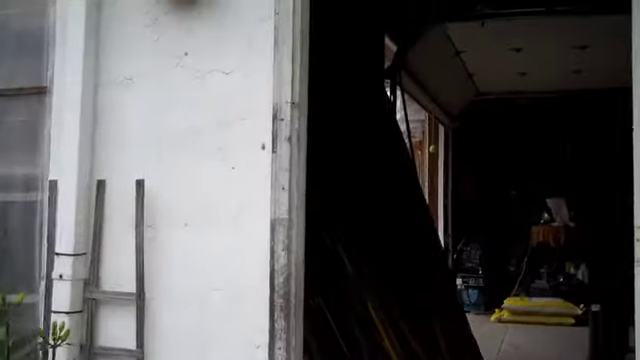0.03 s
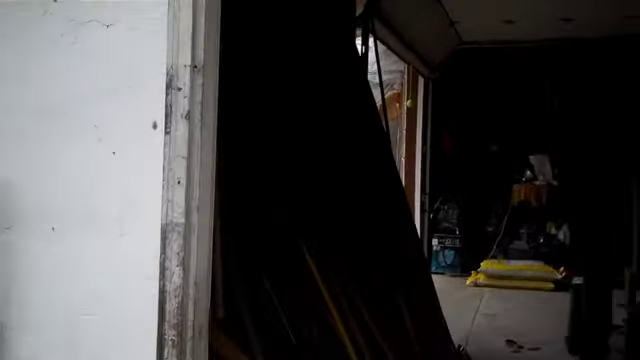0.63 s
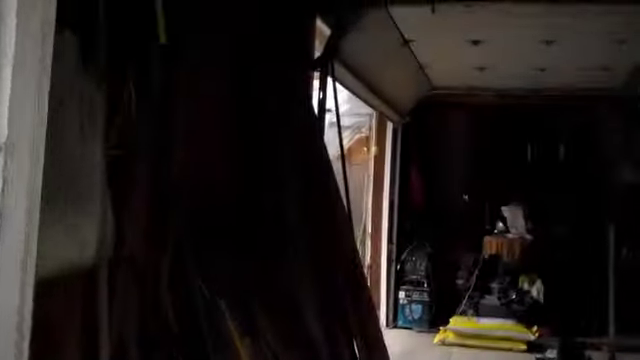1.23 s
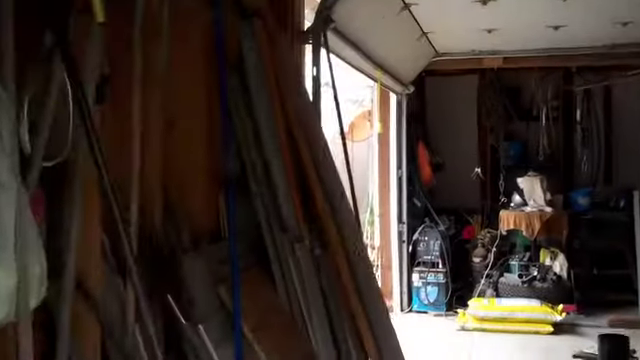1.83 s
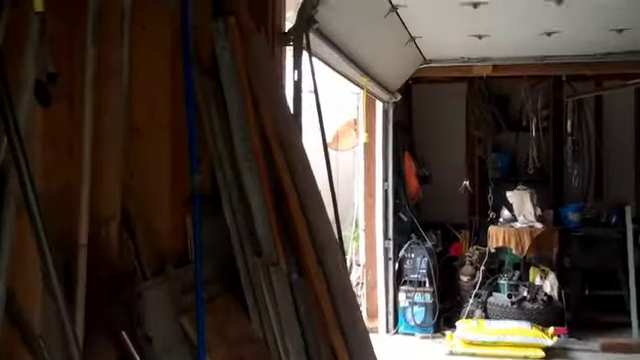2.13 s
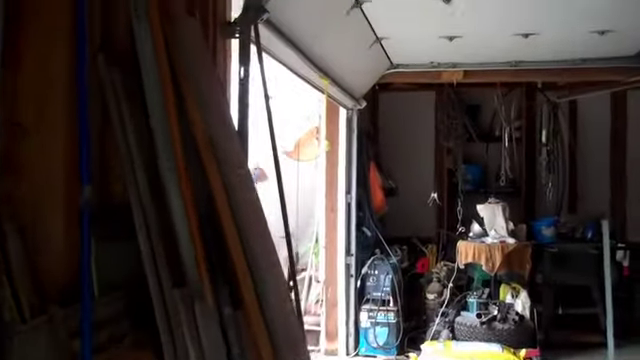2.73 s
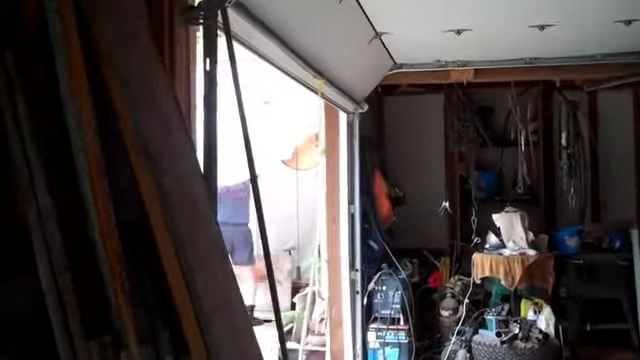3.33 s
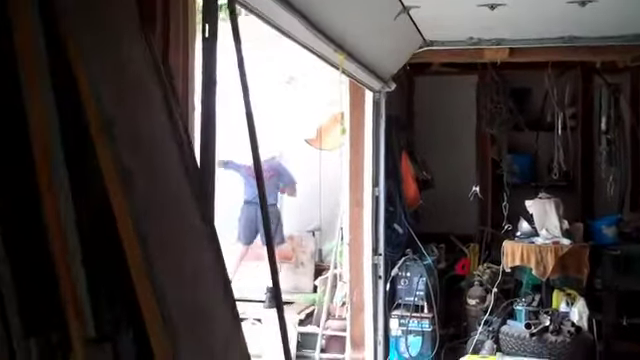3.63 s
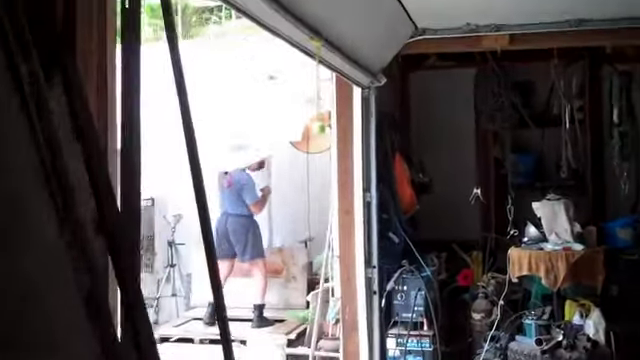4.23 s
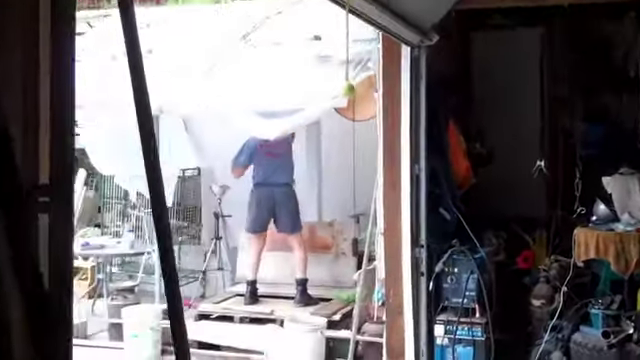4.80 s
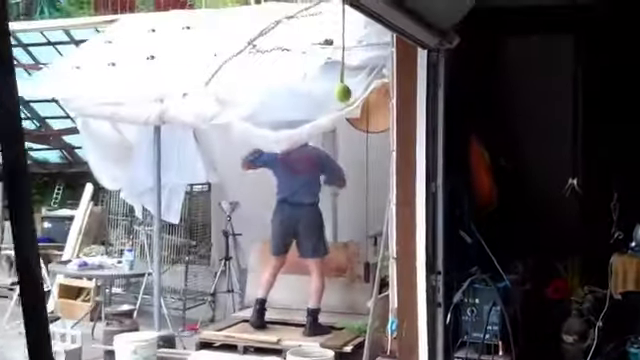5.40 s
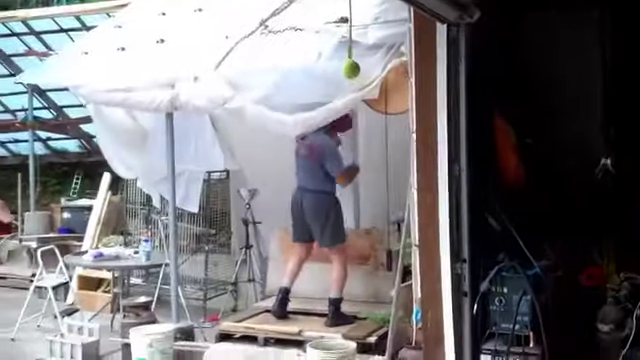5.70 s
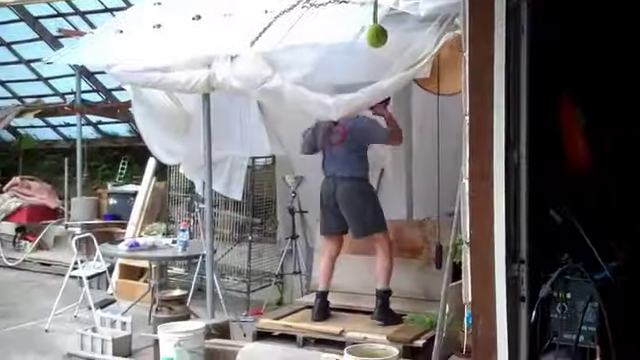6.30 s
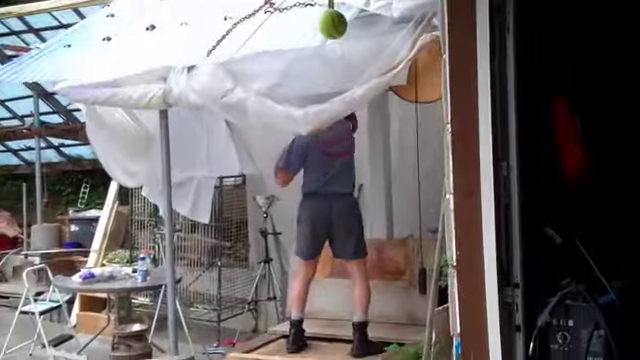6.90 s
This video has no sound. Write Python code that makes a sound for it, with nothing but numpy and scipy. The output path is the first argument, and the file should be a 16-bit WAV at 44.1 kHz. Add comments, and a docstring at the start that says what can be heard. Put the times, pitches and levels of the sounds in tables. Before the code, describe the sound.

Fast rhythmic slaps and knocks of a punched speed bag, with clanking metal swivel, growing nearer over faint outdoor rumble.

```python
"""A speed bag is punched under a wooden board in a yard; the listener walks to it through a garage.
At first, over outdoor rumble and hiss, the blows are soft and arrive largely as reverberation.
In each one the swivel rattles, then the leather slaps, the board knocks and the air bladder thumps;
the loose swivel and the mount clank. As the far door nears, the direct sound takes over,
and at the end the slaps are sharp and overload the microphone."""
import sys
import numpy as np
from scipy import signal
from scipy.io import wavfile
from scipy.ndimage import uniform_filter1d, map_coordinates

SR = 44100
rng = np.random.default_rng(int(sys.argv[2]) if len(sys.argv) > 2 else 0)


def inscribe(sig):
    """Save sig as 16-bit PCM at rate SR to the path in sys.argv[1].

    A 1-D sig is mono; a 2-D sig holds one channel per row.
    Samples are clipped to [-1, 1] before scaling.
    """
    pcm = np.round(np.clip(np.atleast_2d(sig).T, -1, 1) * 32767)
    wavfile.write(sys.argv[1], SR, pcm.astype(np.int16))


N = 306495
AGE = np.arange(SR // 2) / SR  # time since a contact
RATTLE_LEAD_S = 0.0115  # the swivel sounds ahead of the contact

# The bag lands on the board about nine times a second, hardest just after a punch.
# Square landings are short, glancing ones long: t/s, strength/dB, contact time/s
REBOUNDS = [(.0054, -35.5, 0.0073), (.142, -35, .002), (0.2658, -34.5, .0057), (.388, -34.5, .003),
            (0.5144, -38.5, 0.0073), (.6658, -37.5, 0.0038), (.814, -31, 0.0054), (.896, -21.5, 0.0021),
            (.991, -29, 0.0073), (1.106, -40.5, 0.0068), (1.2178, -28, .005), (1.3274, -25.5, 0.0036),
            (1.426, -42, 0.0036), (1.568, -29, 0.0052), (1.7016, -27, 0.0047), (1.7768, -19.5, .0046),
            (1.8746, -27, .007), (1.9943, -26.5, 0.0042), (2.1119, -23.5, 0.0052), (2.2226, -25, .004),
            (2.3347, -25, 0.0073), (2.4701, -26.5, 0.0045), (2.605, -23.5, 0.0048), (2.6876, -15.5, 0.0046),
            (2.7768, -19, .006), (2.887, -24, 0.0039), (3.1048, -20, .006), (3.222, -25.5, .0016),
            (3.361, -35.5, 0.0045), (3.5031, -23.5, 0.004), (3.5936, -19, 0.0024), (3.6964, -23, 0.0045),
            (3.8221, -22.5, 0.0023), (3.9306, -20, 0.0031), (4.0402, -19, .003), (4.16, -19.5, .0015),
            (4.3042, -26.5, .001), (4.4482, -21.5, .0013), (4.523, -12.5, 0.0051), (4.6161, -18, 0.003),
            (4.7314, -19.5, 0.0039), (4.7931, -19, 0.0055), (4.845, -17.5, .0023), (4.951, -13.5, 0.0026),
            (5.062, -17.5, 0.0047), (5.1984, -20.5, 0.0041), (5.33, -19, .0034), (5.4058, -12, 0.0047),
            (5.5047, -15.5, 0.0044), (5.6224, -17, 0.0049), (5.7411, -15.5, 0.0047), (5.8494, -13, .005),
            (5.96, -16.5, .0058), (6.092, -21.5, 0.0029), (6.2276, -15, .003), (6.31, -11.5, 0.0042),
            (6.4023, -14.5, 0.0047), (6.5159, -17, 0.0041), (6.5734, -18, 0.0049), (6.6242, -19.5, 0.0025),
            (6.7222, -13.5, .005), (6.8276, -16.5, 0.0059)]
# The fist meets the bag between rebounds: t/s, strength/dB, bladder thump/dB
PUNCHES = [(0.2526, -42, -49), (0.861, -39, -31.5), (1.164, -45.5, -42), (1.745, -36.5, -35.5),
           (2.657, -25, -32.5), (2.947, -31, -38), (2.9954, -30.5, -33), (3.881, -37, -39.5),
           (3.989, -35, -46), (4.496, -25.5, -32), (4.898, -33, -42), (5.3798, -23.5, -36),
           (5.693, -31, -41), (6.1746, -35.5, -49), (6.2755, -22, -29), (6.6777, -29, -37)]


def amp(db):
    """Amplitude ratio of a level: tenfold for every 20 dB."""
    return 10 ** (np.asarray(db) / 20)


def unit(x):
    """Normalisation to a mean energy of 1 per channel."""
    return x / np.sqrt(np.mean(np.sum(x ** 2, -1)) + 1e-20)


def read(points, hz):
    """Interpolation of a table on a logarithmic frequency axis."""
    f, value = np.transpose(points)
    return np.interp(np.log(hz + 1), np.log(f + 1), value)


def add(mix, s, sound):
    """Superposition: a sound joins the mix at time s."""
    part = mix[:, max(round(s * SR), 0):][:, :sound.shape[-1]]
    part += sound[..., :part.shape[1]]


def response(points, modes=(), size=4096):
    """Minimum-phase impulse response of a spectrum with resonance peaks on top."""
    hz = abs(np.fft.fftfreq(size, 1 / SR))
    db = read(points, hz) + sum(peak / (1 + (2 * (hz - f) / width) ** 2) for f, width, peak in modes)
    log_spectrum = np.conj(signal.hilbert(np.log(amp(db))))
    return np.fft.ifft(np.exp(log_spectrum)).real[:size // 2]


def through(x, taps):
    """Linear filtering: both channels are convolved with an impulse response."""
    return signal.oaconvolve(x, np.atleast_2d(taps), axes=1)[:, :x.shape[1]]


def diffuse(size, apart_hz=5000, leak_db=-22):
    """Diffuse field: at two close ports the noise is coherent in the bass but not in the treble."""
    mid, side = rng.standard_normal((2, size))
    side = amp(leak_db) * side + signal.lfilter(*signal.butter(1, apart_hz, "high", fs=SR), side)
    return np.array([mid + side, mid - side])


def clumps(depth_db, size=48):
    """Reflections arrive in bunches: a random gain that changes about every millisecond."""
    wobble = uniform_filter1d(rng.standard_normal(len(AGE)), size) * np.sqrt(size)
    return amp(depth_db * wobble)


def walk(s):
    """The sound field at time s: the direct-to-reverberant ratio rises towards the door."""
    # t/s, direct share of the attack (0-1), reverberation/dB, rumble/dB, hiss/dB
    path = [(0, 0.6, -5, -42.5, -53), (1.0, 0.52, -4, -41.5, -56), (1.7, 0.58, -6.5, -41, -57.5),
            (2.6, 0.43, -7, -43.5, -52), (3.3, 0.22, -5.5, -45, -51), (3.6, 0.6, -7, -46, -56),
            (4.4, 0.81, -10.5, -47.5, -58), (6.95, 0.88, -11.5, -46.5, -55)]
    times, *columns = np.transpose(path)
    return [np.interp(s, times, column) for column in columns]


def background():
    """Ambient noise: distant rumble and faint hiss, diffuse fields whose levels vary along the walk."""
    # Noise spectra: f/Hz, level/dB
    rumble_spectrum = [(18, -27), (35, -6.5), (70, 1), (125, 2.5), (200, -7), (370, -5), (700, 4.5),
                       (980, 2.5), (1250, -2.5), (2700, -15), (8000, -42)]
    hiss_spectrum = [(300, -28), (2000, -5), (5000, 4), (9000, -0.5), (14000, -1.5)]
    _, _, rumble_db, hiss_db = walk(np.arange(N) / SR)
    rumble = amp(rumble_db) * through(diffuse(N), unit(response(rumble_spectrum)))
    hiss = amp(hiss_db) * through(diffuse(N), unit(response(hiss_spectrum)))
    return rumble + hiss


def reverberation(rise_s=0.0078):
    """Reverberation builds up quickly and decays exponentially, the treble first."""
    # Decay of the garage: f/Hz, T60/s
    decay_times = [(150, 0.54), (500, 0.5), (1500, 0.34), (4000, 0.31), (7000, 0.28), (13000, 0.25)]
    hz, t, bands = signal.stft(diffuse(len(AGE)), SR, nperseg=256)
    decay = amp(-60 * t / read(decay_times, hz)[:, None])
    tail = signal.istft(bands * decay, SR)[1][:, :len(AGE)]
    return unit(tail * clumps(depth_db=2) * (1 - np.exp(-AGE / rise_s)))


def placed(x):
    """Time and level differences: sound from the right reaches the left port later, mostly shaded."""
    # Bearing of the bag: t/s, left delay/s, left gain/dB
    bearing = [(0, 0.000042, -1.5), (1.7, 0.00002, .8), (2.7, 0.000062, -1), (3.3, 0.000032, 0),
               (3.8, 0.000017, -0.5), (4.3, 0.0000045, 0), (6.95, 0.000019, -0.16)]
    times, lags, shade_db = np.transpose(bearing)
    t = np.arange(N) / SR
    left = map_coordinates(x[0], [(t - np.interp(t, times, lags)) * SR], order=3)
    return np.array([left * amp(np.interp(t, times, shade_db)), x[1]])


def swivel(level_db=10, uneven_db=3, rise_s=0.004, fade_s=0.009):
    """Play in a joint: the swivel rattles in a burst of noise just before each contact."""
    # Spectrum of the rattle: f/Hz, level/dB
    rattle_spectrum = [(300, -18), (900, 6.5), (1500, -3), (2300, -9.5), (3200, -6), (8000, -19.5),
                       (14000, -26.5)]
    envelope = np.exp(-AGE / fade_s) * (1 - np.exp(-AGE / rise_s))
    out = np.zeros((2, N))
    for s, db, _ in REBOUNDS + PUNCHES:
        rattle = unit(diffuse(len(AGE)) * clumps(depth_db=4) * envelope)
        start = s - RATTLE_LEAD_S * rng.uniform(0.95, 1.15)
        add(out, start, amp(db + level_db + uneven_db * rng.standard_normal()) * rattle)
    return through(out, unit(response(rattle_spectrum)))


def lesser_bursts(mount_hz=600, swivel_hz=1650, tail_hz=450, spread=0.16):
    """Momentum transfer: punches tug the mount, swings throw the swivel. A low-mid tail follows each
    landing. Returns t/s, level/dB, f/Hz."""
    tugs = [(s, thump_db + 20, mount_hz) for s, _, thump_db in PUNCHES]
    throws = [(s - RATTLE_LEAD_S, db, swivel_hz) for s, db, _ in REBOUNDS]
    low_tails = [(s + 0.018, db - 4, tail_hz) for s, db, _ in REBOUNDS]
    return [(s, db, hz * np.exp(spread * rng.standard_normal()))
            for s, db, hz in tugs + throws + low_tails]


def clanks(level_db=6, edge_ratio=1.22, room_db=-5, ring_hz=1528, ring_t60=0.18, ring_db=-14):
    """Impact excitation: a loose joint hits its stop in a band of noise and leaves the metal ringing."""
    # Prominent clanks of swivel (high) and mount (low): t/s, level/dB, f/Hz
    prominent = [(1.781, -7, 445), (2.606, -6, 1080), (2.687, -9, 1020), (3.013, -12.5, 420),
                 (4.439, -9, 1670), (4.525, -3.5, 560), (4.794, -6, 1500), (4.943, -6.5, 1440),
                 (5.399, -1, 1010), (6.082, -6.5, 1860), (6.611, -4.5, 1960), (6.747, -3, 1580),
                 (6.817, -2.5, 1590), (6.828, -6, 1480)]
    envelope = np.exp(-AGE / 0.0072) * (1 - np.exp(-AGE / 0.0058))
    ring = unit(np.sin(2 * np.pi * ring_hz * AGE) * amp(-60 * AGE / ring_t60))
    out = np.zeros((2, N))
    for s, db, hz in prominent + lesser_bursts():
        burst = unit(diffuse(len(AGE)) * envelope) + amp(room_db) * reverberation()
        band = signal.butter(2, [hz / edge_ratio, hz * edge_ratio], "band", fs=SR)
        clank = unit(signal.lfilter(*band, burst))
        add(out, s, amp(db + level_db) * (clank + amp(ring_db) * ring))
    return out


def thump(direct, pulse_hz=125, delay_s=0.00882, boom_db=1):
    """Air spring: the bladder is squeezed and recoils in one swing; a low room boom rings on after it."""
    # Low room modes: f/Hz, level/dB, T60/s
    room_modes = [(68, -18, 0.26), (90, -15.5, 0.36), (121.8, -10, 0.24), (161.2, -14, 0.3)]
    squeeze = rng.uniform(0.8, 1.1)
    u = (np.pi * pulse_hz * squeeze * (AGE - delay_s)) ** 2
    push = (2 * u - 1) * np.exp(-u)
    boom = np.zeros(len(AGE))
    for hz, db, t60 in room_modes:
        cycles = hz * rng.uniform(0.911, 1.07) * AGE + rng.random()
        boom += amp(db - 60 * AGE / t60) * np.sin(2 * np.pi * cycles)
    swing = direct * push + amp(boom_db) * boom * (1 - np.exp(-AGE / delay_s))
    low_cut = signal.butter(2, 42, "high", fs=SR)  # a small bag radiates no deep bass
    return signal.lfilter(*low_cut, swing)


def softened(knock, board_db, dull_hz=1500, boost_db=2):
    """Contact time limits bandwidth: a lazy rebound leans on the board longer and knocks duller."""
    edge_hz = np.clip(dull_hz * amp(-board_db), 500, 8000)
    dulled = signal.lfilter(*signal.butter(2, edge_hz, fs=SR), knock)
    return amp(boost_db * dull_hz / edge_hz) * dulled


def contact(length_s, direct, snap_gap_s=0.002, scatter_s=0.018, uneven_db=6, touch_db=-10):
    """Reflection and scattering of a blow: one snap if it lands square, several if it glances."""
    # Early reflections from board, wall and floor: delay/s, level/dB
    echoes = [(.0021, -4.5), (.0036, -7), (.0055, -8), (.008, -13.5), (0.0136, -18)]
    count = int(np.clip(np.ceil(length_s / snap_gap_s), 1, 8))
    jitter = rng.random(8)[:count]
    snap_times = (np.arange(count) + jitter - jitter[0]) / count * length_s
    snaps = np.zeros(len(AGE))
    snaps[(snap_times * SR).astype(int)] = amp(uneven_db * rng.standard_normal(8)[:count])
    snaps[0] *= amp(touch_db)  # the first touch is lighter than the full contact
    early = snaps.copy()
    for delay, db in echoes:
        early += amp(db) * np.roll(snaps, round(delay * rng.uniform(0.88, 1.12) * SR))
    envelope = np.exp(-AGE / scatter_s) * (1 - np.exp(-AGE / 0.0016))
    scattered = diffuse(len(AGE)) * clumps(depth_db=4) * envelope  # off nearby clutter
    return np.sqrt(direct) * unit(early) + np.sqrt(1 - direct) * unit(scattered)


def blows(swing_s=0.11, soft_db=-24.5, indoor_db=-8, fist_contact_s=0.0058):
    """Energy partition: strength, swing time and the walk set the balance of each contact.
    Yields t/s, strength/dB, relative reverberation/dB, relative knock/dB, thump/dB, contact time/s."""
    last_s, last_db = REBOUNDS[0][0] - swing_s, REBOUNDS[0][1]
    for s, db, length_s in REBOUNDS:
        room_db = walk(s)[1]
        late_s = np.clip(s - last_s, 0.78 * swing_s, 1.1 * swing_s) - swing_s
        drive_db = np.clip(db - last_db, -5.5, 5.5)  # how much harder than the last landing
        wet_db = room_db - 0.14 * drive_db - 51 * max(late_s, 0)  # driven or slow swings land drier
        # A driven bag knocks more; in soft landings the slap fades faster than the knock.
        board_db = -5.5 + 0.17 * drive_db + 0.5 * max(soft_db - db, 0)
        # A slow swing squeezes the bladder less; walls shade the slap but not the bass.
        bladder_db = db - 17 - 124 * late_s + 0.8 * (room_db - indoor_db)
        yield s, db, wet_db, board_db, bladder_db, length_s
        last_s, last_db = s, db
    for s, db, bladder_db in PUNCHES:
        wet_db = walk(s)[1] + 4  # the boxer's body hides a punch, so more comes by way of the room
        yield s, db, wet_db, -1.5, bladder_db, fist_contact_s


def bag(slap_db=25.5, slap_room_db=30.8, knock_db=26, knock_room_db=31.5, thump_db=7.5):
    """Source and filter: each contact excites the leather and the board and squeezes the bladder."""
    # Spectra of the slap, the knock and what the walls return of a slap: f/Hz, level/dB
    leather_spectrum = [(300, -84), (1200, -20.5), (2000, 5), (2700, 3.5), (4000, 3.5), (6000, 4),
                        (14000, -4)]
    wood_spectrum = [(80, -43), (210, -12.5), (330, -4), (500, -7), (700, -2), (930, -1), (1500, 0.5),
                     (1900, -3.5), (2600, -7), (6000, -49)]
    wall_spectrum = [(3000, 1), (7000, 0), (13000, -1)]
    # Modes of the board and its mount: f/Hz, bandwidth/Hz, peak/dB
    board_modes = [(338, 54, 2), (506, 21, 6.5), (957, 57, 2.5), (1126, 220, 2), (1518, 14, 4.5),
                   (1910, 78, 4)]
    slaps, returns, knocks, thumps = np.zeros((4, 2, N))
    for s, db, wet_db, board_db, bladder_db, length_s in blows():
        direct = walk(s)[0]
        knock = amp(knock_db) * contact(length_s, 0.75 * direct)
        knock += amp(knock_room_db + wet_db) * reverberation()
        add(slaps, s, amp(db + slap_db) * contact(length_s, direct))
        add(returns, s, amp(db + slap_room_db + wet_db) * reverberation())
        add(knocks, s, amp(db + board_db) * softened(knock, board_db))
        add(thumps, s, amp(bladder_db + thump_db) * thump(direct))
    slaps += through(returns, response(wall_spectrum))
    leather = through(slaps, unit(response(leather_spectrum)))
    board = through(knocks, unit(response(wood_spectrum, board_modes)))
    return leather + board + thumps


def scene():
    """Superposition: the bag and its fittings, heard from one bearing, over the diffuse background."""
    return placed(bag() + swivel() + clanks()) + background()


def record(dry, ceiling=1.03, knee=4, edge_hz=15500):
    """Port resonance colours the treble, saturation rounds the loudest slaps, a low-pass follows."""
    # Left and right treble colour, port resonances and then a cut above 14 kHz: f/Hz, gain/dB
    left_colour = [(20, 1), (1000, 0.5), (4000, 4.5), (5600, 5), (6500, 8), (7200, 13), (7800, 10),
                   (8400, 3.5), (9500, -3), (14000, -9.5), (14700, -51.5)]
    right_colour = [(20, 4.5), (1000, 1), (4000, 5), (5200, 7.5), (5900, 13.5), (6700, 7), (7600, -1),
                    (8500, -6), (10000, -12.5), (14000, -24), (14700, -27)]
    coloured = through(dry, [response(left_colour), response(right_colour)])
    saturated = coloured / (1 + abs(coloured / ceiling) ** knee) ** (1 / knee)
    low_pass = signal.firwin(127, edge_hz, window=("kaiser", 9), fs=SR)
    return signal.oaconvolve(saturated, low_pass[None], "same", axes=1)


dry = scene()
out = record(dry)
inscribe(out)
```